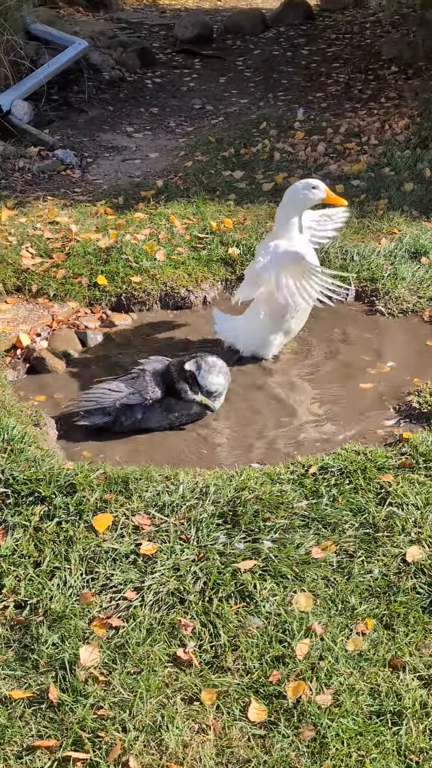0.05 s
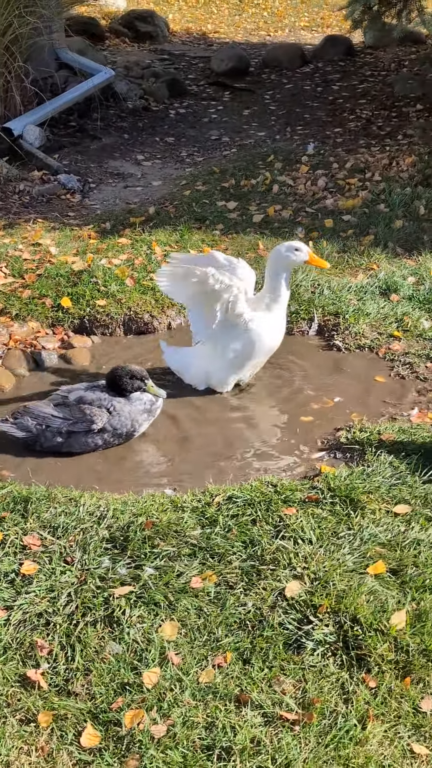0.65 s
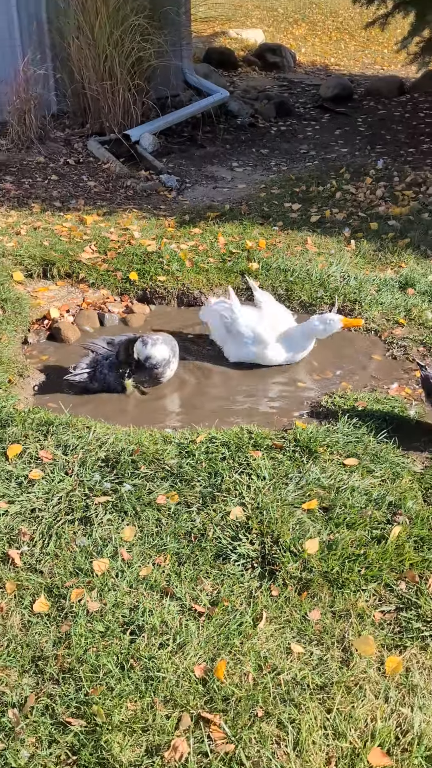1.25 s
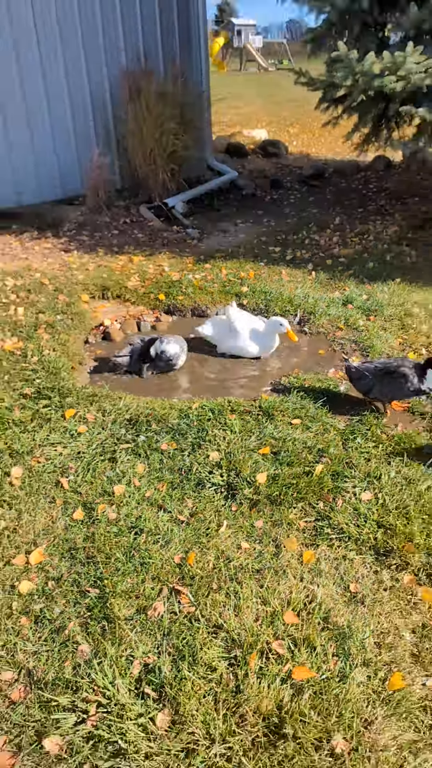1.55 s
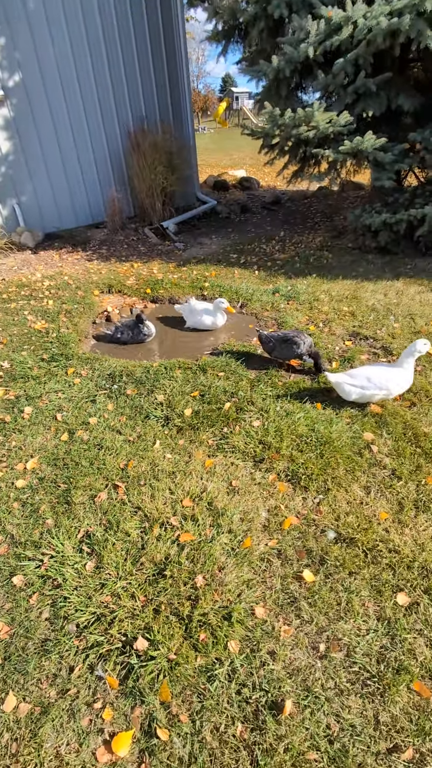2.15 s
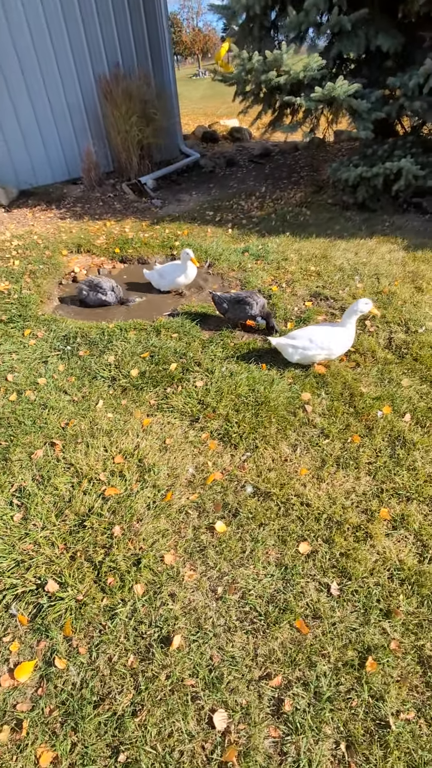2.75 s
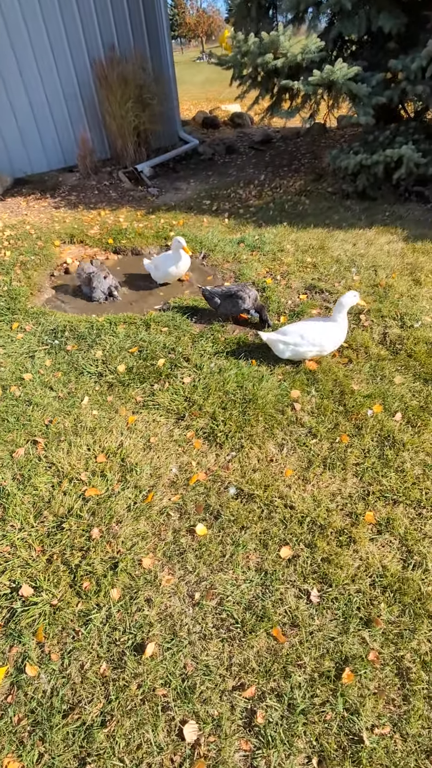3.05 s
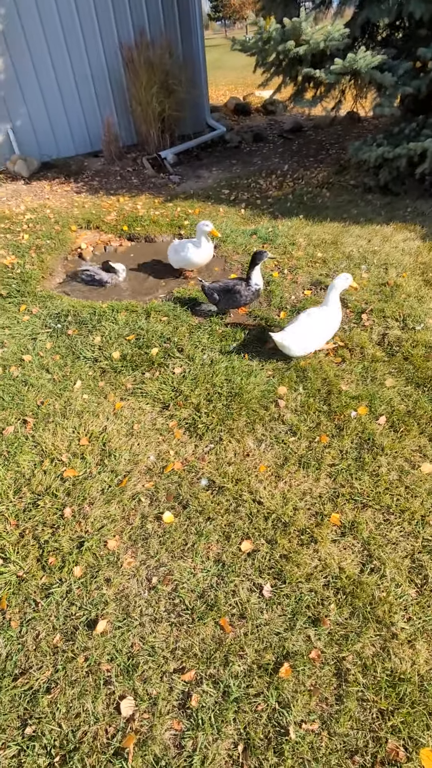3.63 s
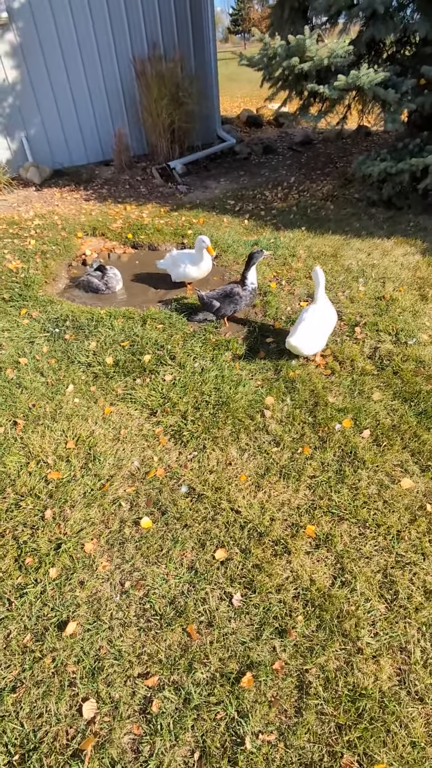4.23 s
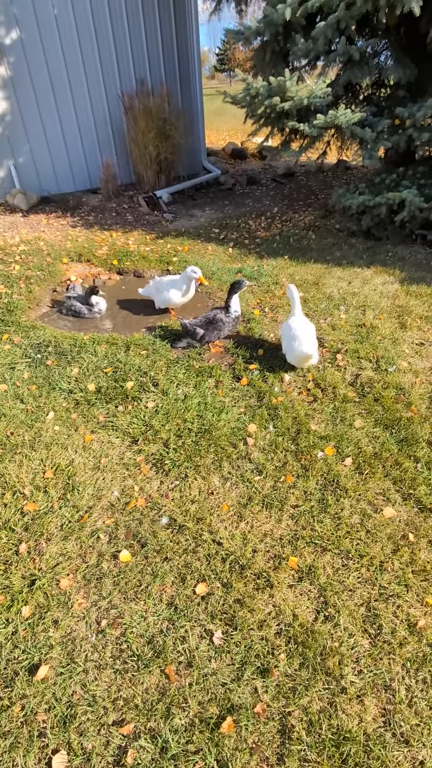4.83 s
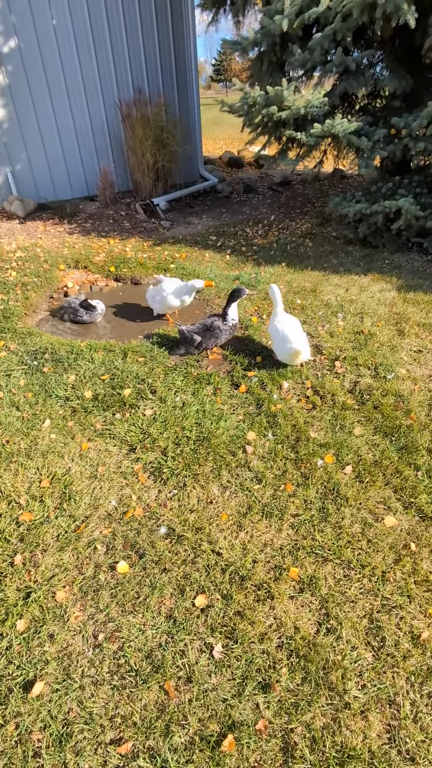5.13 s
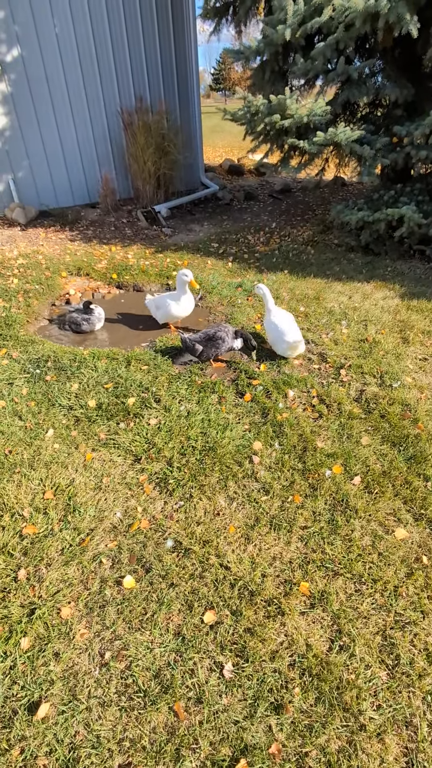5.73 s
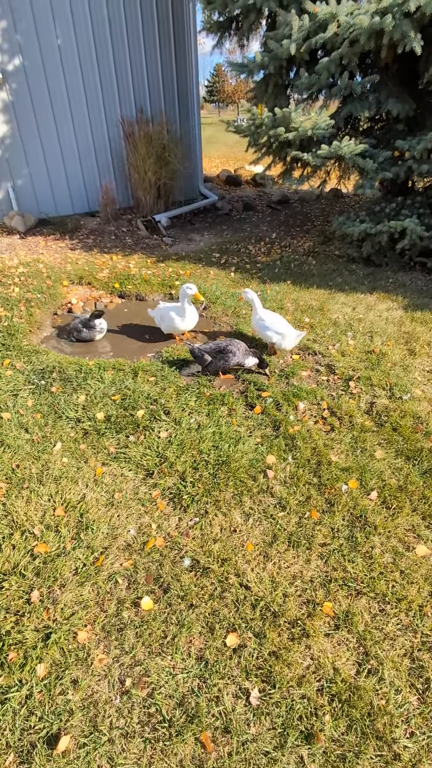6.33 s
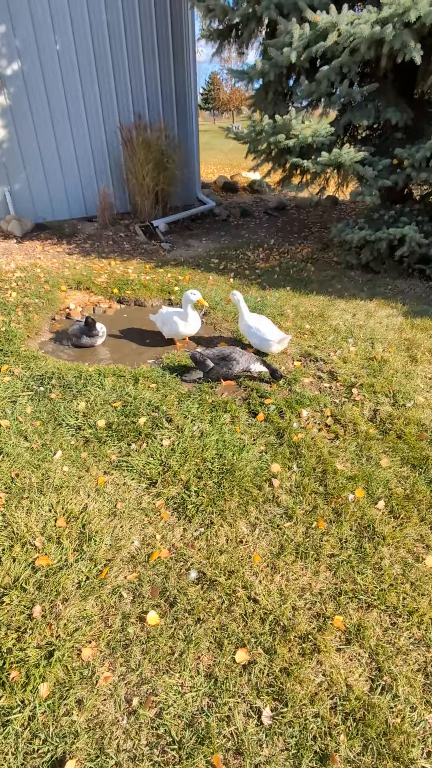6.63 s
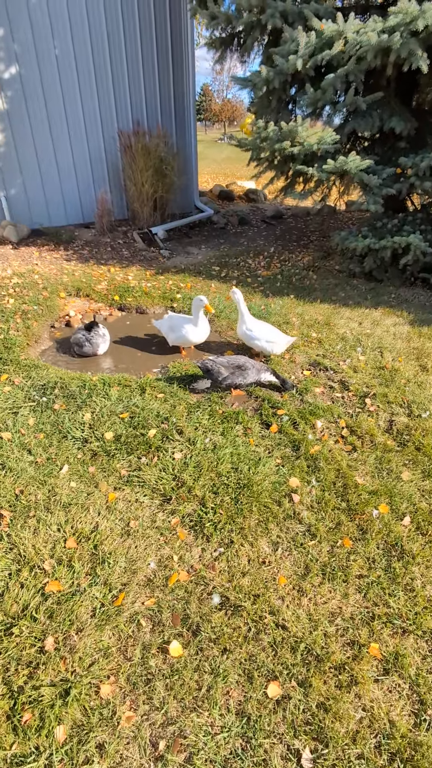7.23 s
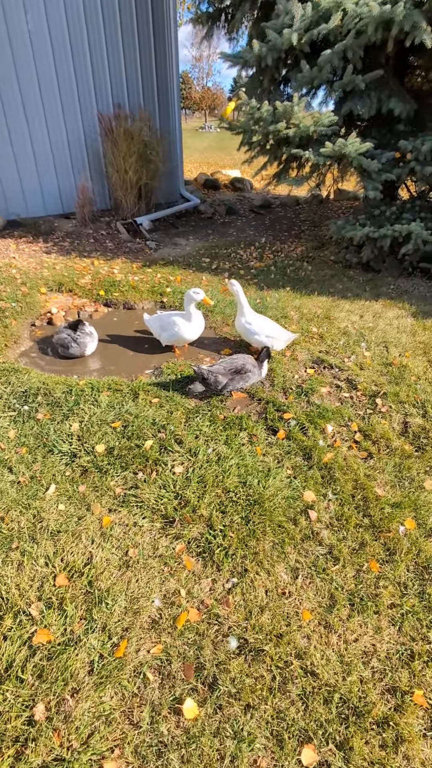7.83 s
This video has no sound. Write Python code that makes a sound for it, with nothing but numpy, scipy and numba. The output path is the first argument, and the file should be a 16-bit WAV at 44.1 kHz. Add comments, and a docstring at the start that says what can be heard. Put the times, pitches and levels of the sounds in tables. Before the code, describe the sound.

A duck beats its wings three times in the first half second, with soft swishes and thumps. Quiet duck chuckles follow until about 1.8 seconds. From about 1.5 to 3.8 seconds a puddle sloshes with small splashes and drips, while dry leaves snap and crackle in the grass. At 2 seconds a duck gives the first of seven long, harsh quacks; the others come at about 3.2, 4.1, 5.1, 6, 6.6 and 7.3 seconds. Each lasts up to half a second or so, swings between a full low voice and a strained squeal, and ends in a grunt. The last three close with sharp, louder yelps, near 6.4, 6.8 and 7.9 seconds. Soft chuckles and thin squeaks fall between the calls. The ducks sound slightly off centre on an open lawn, with a faint far rumble and soft hiss throughout.

```python
"""A domestic duck gives seven long, harsh quacks that swing between a full low voice and a strained
squeal and end in a grunt: pulses from its syrinx ring windpipe, throat, bill and nose. The stereo
microphone is on a lawn beside a metal barn, with the flock off centre at a muddy puddle.
One duck beats its wings first, and soft chuckles fall between the calls. Dry leaves snap and crackle
in the grass, the puddle sloshes with a few splashes, and far off the open air rumbles faintly."""
import sys
import numpy as np
from scipy import signal
from scipy.fft import rfft, irfft, next_fast_len
from scipy.io import wavfile
from scipy.ndimage import uniform_filter1d
from numba import njit

SR = 44100
rng = np.random.default_rng(int(sys.argv[2]) if len(sys.argv) > 2 else 0)


def log_audio(samples):
    """Write samples as a 16-bit WAV file to the path given in sys.argv[1]."""
    # one column per channel
    frames = np.atleast_2d(samples).T
    # limit to full scale, then quantise
    limited = np.clip(frames, -1, 1)
    pcm = np.round(limited * 32767).astype(np.int16)
    wavfile.write(sys.argv[1], SR, pcm)


N = 351918
TIME = np.arange(N) / SR

# snaps and ticks of dry leaves, with a few water splashes: (time [s], level [dB], centre [Hz])
SNAPS_AND_SPLASHES = [(1.04, -63, 1500), (1.062, -48.5, 3630), (1.202, -57, 4500), (1.594, -50, 2600),
                      (1.62, -52.5, 6500), (1.706, -48, 4470), (1.722, -30.5, 3600), (1.855, -64, 6000),
                      (1.875, -39, 6100), (2.039, -49, 9100), (2.056, -56, 7400), (2.073, -41.5, 5530),
                      (2.147, -47, 5000), (2.2196, -42, 6100), (2.226, -44, 6500), (2.2525, -42, 5850),
                      (2.301, -50, 12500), (2.378, -41.5, 3950), (2.545, -44, 3650), (2.582, -52, 12000),
                      (2.618, -52, 12100), (2.702, -58, 7400), (2.741, -58, 12900), (2.799, -59.5, 7900),
                      (2.952, -44, 4300), (3.009, -49, 4460), (3.12, -42, 4170), (3.145, -49, 12400),
                      (3.164, -41, 5800), (3.1793, -38.5, 5955), (3.689, -51, 11200), (3.7534, -34.5, 3216),
                      (6.938, -51, 2790)]
# within a quack the voice breaks into its full low register: (start [s], length [s], first pitch [Hz],
# last pitch [Hz], air sac [dB], throat lift [dB], bill lift [dB], hoarseness re the squeal [ratio])
BREAKS = [(1.92, .035, 173.6, 166.1, -36.5, 8, 4, 1.37), (2.043, 0.033, 196, 202.8, -36, 5.5, 5, 1.6),
          (3.237, 0.052, 180.1, 226.2, -37, -1, -0.5, 2.1), (3.344, 0.1, 228.1, 228.2, -35, 4, 5, 1.5),
          (3.484, 0.13, 292.7, 297.3, -41.5, 1.5, 2.5, 1.4),
          (4.123, 0.19, 203.8, 230.4, -38.5, 4, 5.5, 1.3), (4.303, 0.022, 267.3, 271.5, -39, 4.5, -0.5, 1),
          (4.387, 0.056, 275.7, 318, -43, 3, 5.5, 1), (5.128, 0.078, 198.3, 225.1, -41, 1.5, 3, 1.2),
          (5.273, 0.049, 267.9, 280.5, -42.5, 5, 0.5, 1), (5.324, .07, 315.8, 321, -48.5, 3.5, 4, 1.2),
          (6.043, 0.15, 303.5, 333.8, -49, 9.5, 9.5, 1.1), (6.568, 0.18, 226.1, 230.5, -35, 5.5, 4, 1.23),
          (7.44, .075, 214.6, 241, -42, 6, 5.5, 1.9), (7.558, 0.056, 262.8, 282, -45.5, 3, 2.5, 1.9),
          (7.624, 0.059, 219, 234.3, -41, 7, 7.5, 1.8)]
# the grunt and yelp that close each long quack: (time [s], throat [dB], air sac [dB], yelp [dB])
GRUNTS = [(2.48, -40.5, -44.5, -34), (3.668, -40.5, -42, -41), (4.509, -37.5, -48, -38),
          (5.471, -35, -45.5, -30.5), (6.377, -53, -45, -18), (6.839, -30, -39.5, -16),
          (7.915, -33, -46, -22)]
BREAK_EDGE_S = 0.009   # how fast the register changes over
THROB_PER_S = 37   # the squeal pulses in level and pitch


def from_db(db):
    """Decibels to gain."""
    return 10 ** (np.asarray(db) / 20)


def rms_one(x):
    """Scale to unit power."""
    return x / np.sqrt(np.mean(x ** 2) + 1e-20)


def even(x, size=900):
    """Hold the short-term power at one."""
    return x / np.sqrt(np.abs(uniform_filter1d(uniform_filter1d(x * x, size), size)) + 1e-12)


def blend(a, b, share):
    """Crossfade at constant power."""
    return np.sqrt(1 - share) * a + np.sqrt(share) * b


def in_time(rows):
    """The columns of a curve, sample by sample."""
    s, *columns = np.transpose(rows)
    return [np.interp(TIME, s, c) for c in columns]


def drift(per_s):
    """Smooth random wander of spread one."""
    knots = rng.standard_normal(int(2 * per_s * N / SR) + 2)
    return rms_one(np.interp(TIME * 2 * per_s, np.arange(len(knots)), knots))


def gate(start, length, attack, release):
    """Attack, hold and release with rounded edges, from 0 to 1."""
    return (1 + np.tanh((TIME - start) / attack)) * (1 + np.tanh((start + length - TIME) / release)) / 4


def swells(rows):
    """Bell-shaped bursts whose powers add, from rows of (time [s], level [dB], half length [s])."""
    powers = (from_db(db) ** 2 * np.exp(-np.minimum(((TIME - s) / half) ** 2, 20))
              for s, db, half in rows)
    return np.sqrt(sum(powers))


def at_hz(points, hz):
    """Read a spectrum on a log-frequency axis."""
    f, value = np.transpose(points)
    return np.interp(np.log(hz + 1), np.log(f), value)


def colour(x, gain):
    """Filter by a gain given as a function of frequency."""
    size = next_fast_len(N + 4096)
    return irfft(rfft(x, size) * gain(np.arange(size // 2 + 1) * SR / size), size)[..., :N]


def band(x, hz, kind, order=2):
    """Butterworth filter."""
    return signal.sosfilt(signal.butter(order, hz, kind, fs=SR, output="sos"), x + 1e-18)


def resonate(x, hz, width_hz, count=1):
    """A fixed resonance, applied count times for steeper skirts."""
    r = np.exp(-np.pi * width_hz / SR)
    feedback = [1, -2 * r * np.cos(2 * np.pi * hz / SR), r * r]
    for _ in range(count):
        x = signal.lfilter(np.array([1, 0, -1]) * (1 - r * r) / 2, feedback, x + 1e-18)
    return x


@njit
def two_pole(x, turn, r):
    """Resonator with pole radius r whose centre, turn [radians per sample], moves."""
    y = np.zeros(len(x))
    for i in range(2, len(x)):
        y[i] = (1 - r) * (x[i] - x[i - 2]) + 2 * r * np.cos(turn[i]) * y[i - 1] - r * r * y[i - 2]
    return y


def cavity(x, hz, width_hz):
    """An air resonance whose centre may move."""
    return two_pole(x + 1e-18, np.full(N, 2 * np.pi * hz / SR), np.exp(-np.pi * width_hz / SR))


def steep_cavity(x, hz, width_hz):
    """An air resonance with steep skirts."""
    return cavity(cavity(x, hz, width_hz), hz, 2 * width_hz)


def pulses(cycles):
    """A unit click at every whole cycle, shared between two samples."""
    at = np.flatnonzero(np.diff(np.floor(cycles)) > 0)
    late = (np.floor(cycles[at + 1]) - cycles[at]) / (cycles[at + 1] - cycles[at])
    out = np.zeros(N)
    out[at], out[at + 1] = 1 - late, late
    return out


def glides(rows, edge_s, waver):
    """Short, nearly pure tones that slide from one pitch to another."""
    hz, = in_time([point for s, length, _, first, last in rows
                   for point in [(s, first), (s + length, last)]])
    level = sum(gate(s, length, edge_s, edge_s) * from_db(db) for s, length, db, *_ in rows)
    cycles = np.cumsum(hz * (1 + waver * drift(100))) / SR
    return level * np.sqrt(2) * np.sin(2 * np.pi * cycles)


def stereo_noise(spectrum, likeness):
    """Coloured noise, partly shared by the two sides of the microphone."""
    mid, side = rng.standard_normal((2, N))
    mid = colour(mid, lambda hz: np.sqrt(1 + at_hz(likeness, hz)))
    side = colour(side, lambda hz: np.sqrt(1 - at_hz(likeness, hz)))
    return rms_one(colour(mid + side * [[1], [-1]], lambda hz: from_db(at_hz(spectrum, hz))))


def open_air(split_hz=400):
    """A far rumble that swells slowly, under a soft hiss."""
    # colour of the open air: (frequency [Hz], density [dB])
    spectrum = [(15, -50), (25, -6.5), (86, -4.5), (389, -23), (684, -16), (848, -17.5), (1020, -15.5),
                (1270, -16.5), (1710, -15), (2060, -22), (3720, -26.5), (4380, -30.5), (5430, -28),
                (8810, -43.5), (15500, -49.5)]
    # its slow rise and fall: (time [s], rumble [dB], hiss [dB])
    levels = [(0, -54.5, -53.5), (1.3, -53.5, -58.5), (3.0, -50.5, -52.5), (4.5, -49.5, -52.5),
              (5.5, -47, -52.5), (6.1, -49, -54), (7.1, -50, -54), (7.98, -52.5, -47)]
    # how alike it is on the two sides: (frequency [Hz], correlation [0-1])
    likeness = [(40, .35), (90, .68), (300, .7), (700, .3), (1500, .05), (15000, .05)]
    rumble_db, hiss_db = in_time(levels)
    rumble = band(stereo_noise(spectrum, likeness), split_hz, "low") * from_db(rumble_db + drift(1.7))
    hiss = band(stereo_noise(spectrum, likeness), split_hz, "high") * from_db(hiss_db)
    return rumble + hiss


def bumps(half_s=0.026):
    """A few cycles of deep, soft thud."""
    # dull low bumps: (time [s], level [dB], pitch [Hz])
    thuds = [(5.79, -50, 61), (5.96, -44, 85.2), (5.995, -43, 56.6)]
    return sum(swells([(s, db, half_s)]) * np.sin(2 * np.pi * hz * (TIME - s)) for s, db, hz in thuds)


def yard(x, ground_db=-3.5, decay_s=0.016, wall_s=0.021, wall_db=-25, tail_db=-24, t60_s=0.32):
    """The ground scatters the treble at once; the barn wall answers and the trees add a faint tail."""
    t = TIME[:SR // 2]
    unit = lambda h: h / np.sqrt(np.sum(h * h, axis=1, keepdims=True))
    ground, wall, tail = rng.standard_normal((3, 2, len(t)))
    ground = unit(band(ground * np.exp(-t / decay_s), 2200, "high"))
    wall = unit(wall * (t > wall_s) * np.exp(-np.abs(t - wall_s) / decay_s))
    tail = band(unit(tail * from_db(-60 * t / t60_s)), 5000, "low", order=1)
    echo = from_db(ground_db) * ground + from_db(wall_db) * wall + from_db(tail_db) * tail
    return x + signal.fftconvolve(x, echo, axes=1)[:, :N]


def leaves(grains_per_s=400, crunch_lag_s=0.028, crunch_db=-72, crunch_half_s=0.0077):
    """Dry leaves and grass crackle in small clumps of grains; a faint crunch trails the louder snaps."""
    # colour of the crackle: (frequency [Hz], density [dB])
    spectrum = [(800, -5), (2000, -6), (4000, 8.5), (7000, 1), (9000, -2.5), (15500, -3)]
    # longer rustles on the lawn: (time [s], level [dB], half length [s])
    rustles = [(2.2, -62, 0.19), (2.75, -73, 0.049), (3.38, -57.5, 0.27), (7.65, -64.5, 0.16)]
    born = rng.random(N) < grains_per_s * from_db(5 * drift(20)) / SR
    grains = born * from_db(4.5 * np.minimum(rng.exponential(1, N), 4)) * rng.standard_normal((2, N))
    crackle = colour(grains, lambda hz: from_db(at_hz(spectrum, hz)))
    crunches = [(s + crunch_lag_s, crunch_db, crunch_half_s)
                for s, db, _ in SNAPS_AND_SPLASHES if db > -45]
    return swells(rustles + crunches) * rms_one(band(crackle, 500, "high"))


def drips():
    """Single bubbles chirp in the puddle."""
    # bubbles: (start [s], length [s], level [dB], first pitch [Hz], last pitch [Hz])
    chirps = [(1.535, 0.0048, -51.5, 3040, 2860), (1.654, 0.0067, -50.5, 336, 360),
              (1.683, 0.0049, -48, 354, 414), (2.291, 0.0058, -43, 562, 320),
              (2.591, 0.0093, -44.5, 670, 540), (2.648, 0.015, -56, 3710, 4350),
              (2.99, 0.01, -58, 2860, 3020)]
    return glides(chirps, edge_s=0.004, waver=0.0072)


def sloshes(bubbles_per_s=1100, ring_cycles=14):
    """Stirred water fizzes: tiny bubbles ring briefly, the higher the fainter, over a duller gulp."""
    # stirrings of the puddle: (time [s], fizz [dB], half length [s], gulp [dB])
    stirs = [(1.572, -54, 0.01, -57), (1.596, -65, 0.0074, -41.5), (1.644, -71, 0.08, -54),
             (2.059, -44, 0.005, -63), (2.24, -56.5, 0.011, -52.5), (2.599, -55.5, 0.015, -58),
             (2.65, -59.5, 0.1, -55.5), (2.852, -59.5, 0.01, -59), (2.965, -66, 0.011, -56),
             (3.125, -51, 0.0059, -59), (3.176, -41, 0.0061, -42), (4.702, -56, 0.012, -71)]
    pitches = np.geomspace(2200, 13000, 16)
    gains = from_db(-5 * np.log2(pitches / pitches[0])) / np.sqrt(pitches)
    born = rng.random(N) < bubbles_per_s / SR
    kicks = born * from_db(4 * np.minimum(rng.exponential(1, N), 3)) * rng.standard_normal((2, N))
    pitch_index = rng.integers(0, len(pitches), N)
    fizz = sum(gains[k] * resonate(kicks * (pitch_index == k), hz, hz / ring_cycles)
               for k, hz in enumerate(pitches))
    gulp = resonate(kicks, hz=1300, width_hz=1300, count=2)
    fizz_level = swells([(s, db, half) for s, db, half, _ in stirs])
    gulp_level = swells([(s, db, half) for s, _, half, db in stirs])
    return fizz_level * rms_one(fizz) + gulp_level * rms_one(gulp)


def snaps_and_splashes(click_s=.002, tail_s=.014, tail_db=-22):
    """Sharp snaps and ticks of dry leaves, with a few water splashes; each a click with a short tail."""
    out, t = np.zeros((2, N)), TIME[:SR // 10]
    envelope = np.exp(-t / click_s) + from_db(tail_db) * np.exp(-t / tail_s)
    for s, db, hz in SNAPS_AND_SPLASHES:
        noise = rng.standard_normal((2, len(t))) * envelope
        burst = resonate(noise, hz, .55 * hz, count=2) + .04 * noise
        at = int(s * SR)
        out[:, at:at + len(t)] += 2.825 * from_db(db) * burst / np.abs(burst).max()
    return out


def wings(thump_hz=270, thump_width_hz=130, thump_lag_s=0.00337, flick_hz=4500):
    """Feathers swish up and down, then ruffle; each downstroke ends in a flick and a soft thump."""
    # wingbeats, at the end of the downstroke: (time [s], level [dB])
    beats = [(0.073, -36.5), (0.224, -32.5), (.358, -31.5)]
    # colour of the feathers' swish: (frequency [Hz], density [dB])
    spectrum = [(35, -45), (60, -2.5), (312, 2.5), (869, -7.5), (1070, -12), (1960, -11), (2360, -23),
                (4520, -22), (5200, -28.5), (5980, -22), (6560, -27.5), (11200, -31), (15500, -36)]
    # how alike it is on the two sides: (frequency [Hz], correlation [0-1])
    likeness = [(60, 1), (400, 0.89), (1500, 0.45), (15000, 0.025)]
    swish = swells([stroke for s, db in beats for stroke in [
        (s - 0.037, db - 9, 0.02),   # upstroke
        (s, db, 0.011),   # downstroke
        (s + 0.075, db - 16, 0.049)]])   # ruffle
    t = TIME - thump_lag_s
    thump = sum(from_db(db + 2.5) * np.exp(-((t - s) * thump_width_hz) ** 2)
                * np.sin(2 * np.pi * thump_hz * (t - s)) for s, db in beats)
    tips = band(rng.standard_normal((2, N)), flick_hz, "high", order=1)
    flick = swells([(s, db - 14, 0.0033) for s, db in beats]) * tips
    return swish * stereo_noise(spectrum, likeness) + flick + thump


def scatter(x, share):
    """Paths off the grass and the bird's own body smear each pulse over a few milliseconds."""
    for lag in (47, 71, 109):   # samples
        taps = np.r_[share, np.zeros(lag), 1]
        x = np.roll(signal.lfilter(taps, taps[::-1], x + 1e-18), -lag)   # centred on the pulse
    return x


def off_centre(x):
    """The microphone's left port hears the ducks first, and its housing shades each side differently."""
    # shading by the housing: (frequency [Hz], left re right [dB])
    balance = [(300, -2.5), (650, 1.5), (1100, -2.5), (1550, 2.5), (2100, -6), (2900, 1), (5000, -1),
               (15000, -2)]
    # earlier arrival on the left: (frequency [Hz], phase lead [rad])
    lead = [(0, 0), (800, .7), (1280, 1.9), (1950, .7), (2580, 3), (3350, 5.6), (4600, 7.2), (7750, 12.6),
            (16000, 24)]
    delay = lambda hz: np.exp(-1j * np.interp(hz, *np.transpose(lead)))
    left = colour(x, lambda hz: from_db(at_hz(balance, hz) / 2))
    right = colour(x, lambda hz: from_db(-at_hz(balance, hz) / 2) * delay(hz))
    return np.array([left, right])


def chuckles(pops_per_s=87, width_hz=130, edge_hz=2800, fade_db=11, droop=0.093, rise_share=0.55):
    """A slack syrinx opens in slow pops; the bill opens and closes, so its resonances arch."""
    # soft chuckles: (start [s], length [s], level [dB], lower resonance [Hz], upper resonance [Hz],
    # upper re lower [dB], bright ring re lower [dB])
    notes = [(0.114, 0.079, -48.5, 1400, 1950, 5, -24), (0.849, 0.069, -44.5, 1330, 2020, -6.5, -38),
             (1.045, 0.087, -42, 1335, 2140, 1.5, -25), (1.318, 0.068, -47, 1390, 2080, -3.5, -30),
             (1.388, 0.06, -46.5, 1490, 1880, -4, -25), (1.789, 0.061, -43, 1630, 1880, -3, -41),
             (2.565, 0.027, -34.5, 1510, 1740, -7, -28), (2.614, 0.032, -41.5, 1390, 1765, -5, -23),
             (2.764, 0.055, -37.5, 1450, 1750, -9, -38), (2.818, 0.09, -45.5, 1651, 2010, -7, -26),
             (2.949, 0.027, -43.5, 1300, 1589, -5, -28), (3.007, 0.11, -40, 1418, 1830, -11, -29),
             (3.729, 0.11, -39.5, 1580, 1943, -2, -28), (3.972, 0.1, -40.5, 1530, 2050, 1.5, -16),
             (4.534, 0.11, -40, 1590, 2320, -2.5, -20.5), (4.885, 0.082, -41, 1558, 2123, -2, -21),
             (5.628, 0.078, -35, 1414, 2203, 2, -13), (7.012, 0.052, -55, 1685, 2070, -2, -11)]
    arches = []
    for s, length, db, hz, upper_hz, *bright in notes:
        closed = (db - fade_db, hz * (1 - droop), upper_hz * (1 - droop), *bright)
        opened = (db, hz, upper_hz, *bright)
        arches += [(s, *closed), (s + rise_share * length, *opened), (s + length, *closed)]
    db, hz, upper_hz, upper_db, ring_db = in_time(arches)
    inside = sum((TIME > s) & (TIME < s + length) for s, length, *_ in notes)
    sounding = uniform_filter1d(np.minimum(inside, 1.), size=300)
    cycles = np.cumsum(pops_per_s * (1 + .08 * drift(40) + .08 * drift(3))) / SR
    air = rms_one(rng.standard_normal(N) * np.exp(-3 * (cycles % 1)))
    pops = rms_one(pulses(cycles)) * from_db(3 * drift(60)) + .55 * air
    chirp = .95 + .16 * (cycles % 1)   # each pop slides upward
    rung = lambda centre: even(steep_cavity(pops, centre * (chirp + .05 * drift(30)), width_hz))
    ring = even(steep_cavity(pops, hz=4520, width_hz=700)) + from_db(5) * rung(edge_hz)
    tone = rung(hz) + from_db(upper_db) * rung(upper_hz) + from_db(ring_db) * ring
    return band(sounding * from_db(db) * even(tone), 7600, "low", order=4)


def squeaks():
    """Thin falling squeaks as the voice sets in or lets go."""
    # squeaks: (start [s], length [s], level [dB], first pitch [Hz], last pitch [Hz])
    slides = [(2.012, .026, -32.5, 920, 800), (3.212, 0.014, -43, 720, 618), (3.655, 0.02, -39, 740, 586),
              (4.088, 0.037, -38, 910, 702), (4.495, 0.031, -41, 800, 570), (5.105, .016, -40.5, 830, 720),
              (5.453, 0.016, -38.5, 930, 607.4), (5.85, 0.047, -50.5, 1080, 1054),
              (5.966, 0.053, -38.5, 930, 885.2), (6.534, 0.029, -36, 1060, 879),
              (7.133, .012, -47, 880, 816.7), (7.295, 0.046, -45, 770, 729)]
    return glides(slides, edge_s=0.0045, waver=0.01556)


def yelps(hz=1098, lead_s=0.0024, rise_s=0.0034, waver=0.0443):
    """As the pitch collapses, a last push of air makes the throat ring out and die at once."""
    level = 0
    for s, *_, db in GRUNTS:
        age = np.maximum(TIME - s + lead_s, 0) / rise_s
        level = level + from_db(db) * age * np.exp(1 - np.minimum(age, 40))
    return level * np.sin(2 * np.pi * np.cumsum(hz * (1 + waver * drift(90))) / SR)


def quack_contours(attack_s=0.015, release_s=0.014, arch_share=.08):
    """Each quack sets in, holds and stops while its pitch arches; the tract is set anew for each."""
    # each quack as a strained squeal: (start [s], length [s], throat [dB], fade over the call [dB],
    # bill re throat [dB], pitch [Hz], throat [Hz], bill [Hz], windpipe [dB],
    # lower nasal resonance [Hz], its level [dB], upper nasal resonance [Hz], its level [dB])
    calls = [(1.912, 0.04, -34.5, 3, -0.5, 290, 1045, 1500, -8, 3380, -13, 4600, -14),
             (2.018, 0.452, -35.5, 0, -0.5, 320.2, 1010, 1580, -5, 3730, -22, 4300, -17),
             (3.226, 0.41, -37, 1.5, 7, 326.2, 900, 1400, -5, 3560, 4, 4170, 3),
             (4.111, 0.37, -34, 2, -4, 324.3, 1127, 1716, -3, 3390, 1.5, 4690, -1.5),
             (5.115, 0.34, -31, 6, 0, 337.5, 1120, 1825, -7, 3300, 1.5, 4496, -2.5),
             (5.963, 0.43, -40, -1.5, -5, 340.2, 1135, 1651, -5.5, 3440, -0.5, 4750, -6),
             (6.484, 0.0511, -45, -3.5, -6.5, 347.5, 1160, 1692, -17, 3200, -17, 4192, -16),
             (6.565, 0.27, -27, 3, -7.5, 335.2, 1150, 1806, -27, 3235, -0.5, 4562, -0.5),
             (7.135, 0.11, -50.5, -0.5, -3.5, 293, 1130, 1792, -27, 3406, -15.5, 4314, 7.5),
             (7.338, 0.57, -36, -0.5, -5.5, 317.7, 1066, 1655, -10.5, 3430, -13, 4408, 0.5)]
    throat = bill = 1e-6
    settings, arch = [], 1
    for s, length, db, fade_db, bill_db, *shape in calls:
        on = gate(s, length, attack_s, release_s)
        progress = np.clip((TIME - s) / length, 0, 1)
        level = on * from_db(db - fade_db * progress)
        throat, bill = throat + level, bill + level * from_db(bill_db)
        arch = arch + on * arch_share * (np.sin(np.pi * progress) - 2 / np.pi)
        settings += [(s, *shape), (s + .9 * length, *shape)]
    pitch, *tract = in_time(settings)
    return throat, bill, pitch * arch, tract


def registers(throb, glide_s=.012, grunt_hz=187.5, fall_octaves_per_s=8, grunt_half_s=0.01, waver=.012):
    """Breaks and grunts pull the squeal's pitch down and set the air sac going."""
    throat, bill, pitch, tract = quack_contours()
    sac = throat * from_db(-27)   # faint while squealing
    lift_db = np.zeros((2, N))
    throb_db = 4 * np.sin(2 * np.pi * throb)
    for s, length, first_hz, last_hz, sac_db, *louder_db, _ in BREAKS:
        full = gate(s, length, BREAK_EDGE_S, BREAK_EDGE_S)
        sac += full * from_db(sac_db)
        lift_db += np.outer(louder_db, full)
        throb_db *= 1 - full
        pull = gate(s - glide_s / 2, length + glide_s, glide_s, glide_s)
        pitch += pull * (np.interp(TIME, [s, s + length], [first_hz, last_hz]) - pitch)
    for s, *_ in GRUNTS:
        falling = grunt_hz * 2 ** (-fall_octaves_per_s * np.clip(TIME - s, -.05, .05))
        pull = gate(s - .017, .08, BREAK_EDGE_S, BREAK_EDGE_S)   # ahead of the loudest moment
        pitch += pull * (falling - pitch)
    grunt = swells([(s, db, grunt_half_s) for s, db, _, _ in GRUNTS])
    sac += swells([(s, db, grunt_half_s) for s, _, db, _ in GRUNTS])
    throat = throat * from_db(lift_db[0] + throb_db) + grunt
    bill = bill * from_db(lift_db[1]) + grunt * from_db(-8.5)
    return pitch * (1 + waver * drift(25)), 20 * np.log10([sac, throat, bill]), tract


def syrinx(pitch, strain, jitter=.011, strained_jitter=.012, limp=.25):
    """Membranes pulse, strong and weak in turn when hoarse, and air escapes at each opening."""
    hoarse = 1 + sum(gate(s, length, BREAK_EDGE_S, BREAK_EDGE_S) * (ratio - 1)
                     for s, length, *_, ratio in BREAKS)
    cycles = np.cumsum(pitch * (1 + (jitter * hoarse + strained_jitter * strain) * drift(60))) / SR
    uneven = from_db(1.4 * hoarse * drift(150)) * (1 + limp * (hoarse - 1) * np.cos(np.pi * cycles))
    air = hoarse * rms_one(rng.standard_normal(N) * np.exp(-2.5 * (cycles % 1)))
    return cycles, even(pulses(cycles) * uneven), air


def squeal(cycles, pitch, throb, creak_hz=12):
    """Stretched membranes whistle near the third harmonic and higher up, creaking with each throb."""
    creak = creak_hz / (2 * np.pi * THROB_PER_S) * np.sin(2 * np.pi * throb)
    low = 3 * cycles + creak + .05 * drift(110)
    high = np.cumsum(5.45 * pitch * (1 + .03 * drift(35))) / SR + creak
    return np.sqrt(2) * np.sin(2 * np.pi * np.array([low, high]))


def nose(source, lower_hz, lower_db, upper_hz, upper_db, width_hz=460, wander=.018, swell_db=2.5):
    """Two nasal resonances that wander and swell as the bill works."""
    out = 0
    for hz, db in [(lower_hz, lower_db), (upper_hz, upper_db)]:
        level = from_db(db - 9 + swell_db * drift(10))
        out = out + level * even(steep_cavity(source, hz * (1 + wander * drift(9)), width_hz))
    return out


def rasp(source):
    """The harsh overtones above the bill resonance."""
    # colour of the rasp: (frequency [Hz], density [dB])
    spectrum = [(2300, 7), (2900, 7), (3400, 5), (3800, 3), (4600, 3), (5300, 4), (5800, 2), (6500, -4),
                (6950, -3), (7600, -12), (8600, -29), (11000, -22), (15500, -24)]
    return even(band(colour(source, lambda hz: from_db(at_hz(spectrum, hz))), 1900, "high", order=4))


def quacks(throb_pitch_share=.022, bill_wander=.07):
    """Pulses and chopped air ring the tract; as the low voice drops out, the squeal takes over."""
    throb = np.cumsum(THROB_PER_S * (1 + .3 * drift(20))) / SR
    pitch, (sac_db, throat_db, bill_db), tract = registers(throb)
    throat_hz, bill_hz, windpipe_db, *nasal = tract
    strain = np.clip((pitch - 250) / 80, 0, 1)
    # the voice is thin where the air sac is weak and the pitch high
    thin = np.clip((throat_db - sac_db - 9) / 18, 0, 1) * np.clip((pitch - 262) / 35, 0, 1)
    pitch = pitch * (1 + throb_pitch_share * strain * np.cos(2 * np.pi * throb))
    cycles, buzz, air = syrinx(pitch, strain)
    low_whistle, high_whistle = squeal(cycles, pitch, throb)

    windpipe = cavity(buzz + .45 * air, hz=600, width_hz=300)
    windpipe = even(band(windpipe, [420, 820], "band"))
    throat = cavity(buzz + .45 * air, throat_hz, width_hz=170)
    throat = even(band(throat, [800, 1290], "band", order=3))
    throat = blend(throat, low_whistle, .85 * thin)
    bill = cavity(buzz + (.7 + thin / 2) * air, bill_hz * (1 + bill_wander * drift(13)), width_hz=340)
    bill = even(band(bill, [1350, 2100], "band", order=3))
    bill = blend(bill, high_whistle, .75 * thin * strain)
    breathy = buzz + .75 * air
    top = (rasp(breathy) + nose(breathy, *nasal)) * from_db(-thin)
    sac = np.sin(2 * np.pi * cycles) + from_db(-18.5) * np.sin(4 * np.pi * cycles)
    sac *= np.sqrt(2) * from_db(1.65 * drift(90))

    low = from_db(sac_db) * sac + from_db((sac_db + bill_db) / 2 + windpipe_db - 8 * thin) * windpipe
    middle = from_db(throat_db + 1) * throat
    upper = from_db(bill_db) * bill + (from_db(bill_db - 27) + from_db(throat_db - 22)) * top
    flutter = lambda: from_db((1.2 + .8 * strain + .5 * thin) * drift(60))
    return low + middle * flutter() + upper * flutter()


def scene():
    """At the microphone: ducks, water and leaves with the yard's echo, over far air and low bumps."""
    calls = scatter(quacks(), share=0.45) + yelps() + squeaks()
    ducks = off_centre(calls + scatter(chuckles(), share=0.17))
    clicks = snaps_and_splashes()
    water = sloshes() + drips()
    return yard(ducks + wings() + clicks + water + leaves()) + open_air() + bumps()


def record(dry, low_cut_hz=48, high_cut_hz=15900):
    """The deepest bass and the top are cut from the microphone's signal."""
    thinned = band(dry, low_cut_hz, "high", order=6)
    return signal.sosfilt(signal.ellip(10, .1, 80, high_cut_hz, fs=SR, output="sos"), thinned)


dry = scene()
out = record(dry)
log_audio(out)
```